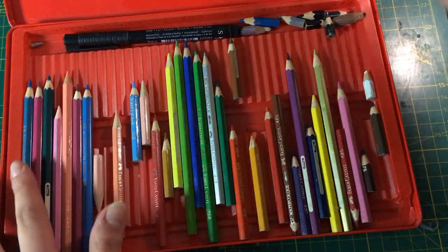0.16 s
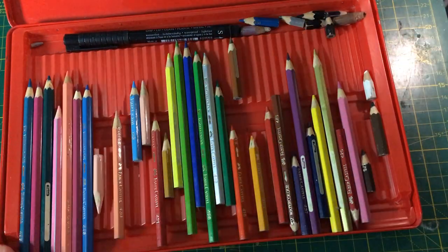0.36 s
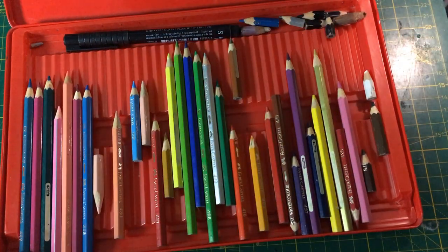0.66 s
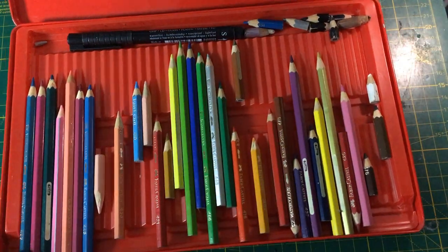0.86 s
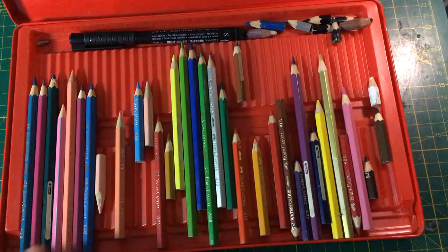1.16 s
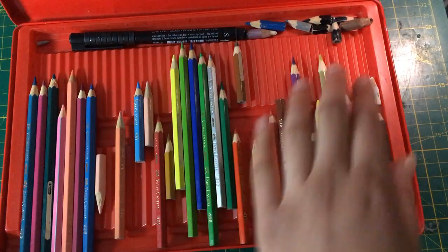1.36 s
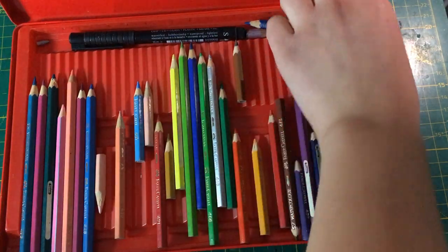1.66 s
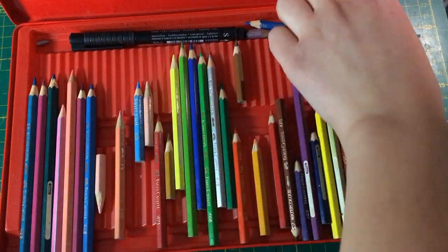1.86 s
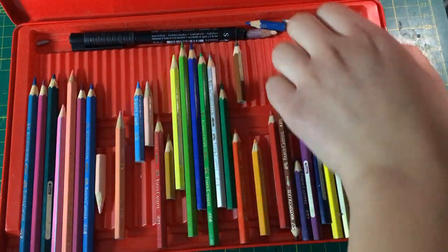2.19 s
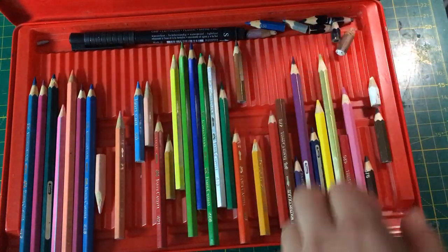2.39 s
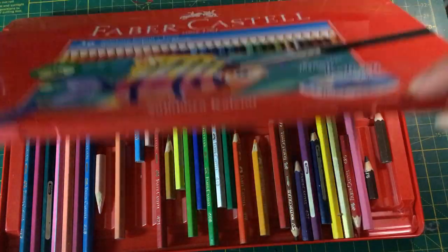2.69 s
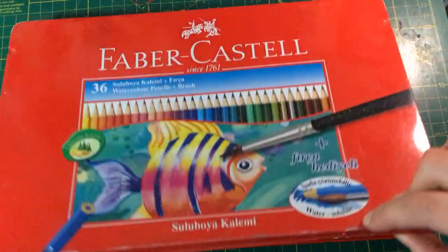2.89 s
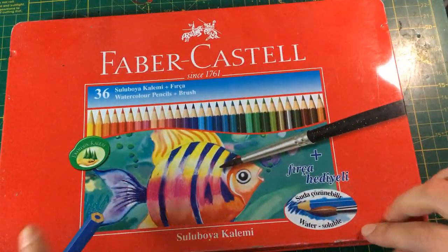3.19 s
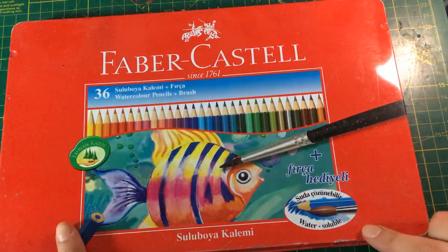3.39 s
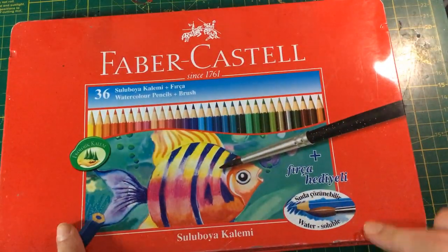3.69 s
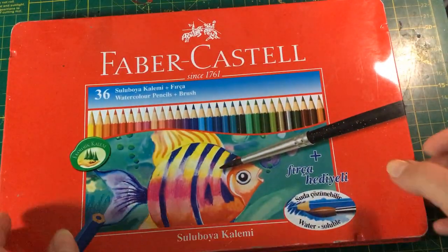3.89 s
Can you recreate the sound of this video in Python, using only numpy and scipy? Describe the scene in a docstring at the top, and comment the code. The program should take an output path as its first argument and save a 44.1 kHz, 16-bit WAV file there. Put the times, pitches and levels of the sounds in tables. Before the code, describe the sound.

Close, dry wooden clacks and a short rattle in a thin metal tin, followed by the lid's clatter, scrape and hard snapping closure.

```python
"""A flat tin of coloured pencils on a cutting mat, taken with a close microphone in a small room.
It slides over the mat, catches and knocks to a stop; fingers touch it, then rattle the pencils in their tray.
The sheet-metal lid is picked up, laid on, scraped into place and pressed shut with a few snaps.
Blows are noise bursts with ringing modes, rubbing is coloured noise in uneven clumps.
A faint fan runs behind it all, and the microphone overloads on the hardest blows."""
import sys
import numpy as np
from scipy import signal
from scipy.fft import rfft, irfft, next_fast_len
from scipy.io import wavfile
from scipy.ndimage import uniform_filter1d, map_coordinates

SR = 44100
rng = np.random.default_rng(int(sys.argv[2]) if len(sys.argv) > 2 else 0)


def transcribe(u):
    """Save the signal u as a 16-bit wav file named by the first command-line argument.

    u: samples, shape (n,) or (channels, n), limited to [-1, 1]; the rate is SR.
    q: integer samples, one column per channel.
    """
    v = np.clip(np.atleast_2d(u).T, -1, 1)
    q = np.round(v * 32767).astype(np.int16)
    wavfile.write(sys.argv[1], SR, q)


N = 178627
TIME = np.arange(N) / SR  # s from the start
AGE = TIME[:SR // 2]  # s since a blow

# lid against the rim; level is that of the middle band, knock is relative to it:
# start_s, level_db, knock_db, main_resonance_hz, contact_t60_s
SNAPS = [(2.9635, -21.5, -4.5, 795, 0.12), (2.9743, -13.5, -18, 850, 0.14), (3.0055, -17, -4.5, 710, 0.073),
         (3.2145, -17, -10, 1480, .1), (3.5535, -1, -5.5, 643, .041), (3.5635, -3.5, -17, 2170, 0.045),
         (3.5774, -3, -4, 650, 0.071), (3.5873, -7, -13, 1740, 0.081), (3.7959, -16, -12, 2260, 0.085),
         (3.9404, -10.5, -1, 693, 0.1)]
SNAP_TREBLE_DB, BOOM_DB = -5, -4  # treble re the middle band; panel's boom re the knock
# lid's edge drags along the rim, before the scrape and hiss gains: start_s, end_s, level_db
SCRAPES = [(2.813, 2.82, -28), (2.87, 2.9, -38.5), (2.912, 2.95, -37.5), (3.0, 3.01, -24),
           (3.185, 3.28, -42), (3.293, 3.303, -31), (3.545, 3.585, -17.5), (3.793, 3.8, -35),
           (3.97, 4.05, -38.5)]
# hollow lid rumbles in the hand: start_s, end_s, level_db
SWINGS = [(2.74, 2.93, -33.5), (2.96, 3.04, -26), (3.22, 3.3, -42)]

# pencils on each other and on the tray; level is that of the middle band, treble is relative to it:
# start_s, level_db, treble_db, main_resonance_hz
CLACKS = [(0.0738, -25.5, 0, 2100), (0.2428, -5.5, -5, 1360), (1.652, -21.5, -12, 1850),
          (1.6601, -17.5, -27, 1490), (1.6958, -16.5, -9, 1880), (1.7094, -15.5, -8, 1710),
          (1.7147, -17, -14, 1860), (1.7369, -13.5, -3, 2030), (1.8355, -12.5, -11, 2250),
          (1.9205, -27, -7.5, 1970), (1.9274, -25.5, -15, 1800), (1.9411, -21.5, -4.5, 3600),
          (1.9997, -40, -7, 3280), (2.019, -43, -2, 3270), (2.0322, -39.5, -5.5, 3360),
          (2.1613, -6.5, -3.5, 2220), (2.1688, -7.5, -18, 2000), (2.188, -16, -6, 2100),
          (2.2101, -8.5, -9.5, 1850)]
CLACK_KNOCK_DB, CLACK_T60_S, CLACK_RISE_S = -18.5, 0.04, 0.0003  # bass re middle; decay; onset constant
# strokes of the fingers over the pencils, before the rubbing and hiss gains: start_s, end_s, level_db
RUMMAGE = [(.46, .51, -53.5), (.87, .885, -37.5), (.94, .965, -37.5), (1.37, 1.41, -49),
           (1.647, 1.674, -29), (1.725, 1.83, -26.5)]

# the push that slides the tin; its level is at full speed, before the friction gains
PUSH_START_S, PUSH_STOP_S, PUSH_RISE_S, PUSH_DB = 0.001, 0.243, 0.067, -24.5
# sliding tin catches on the mat, before the friction gains: start_s, level_db
CATCHES = [(0.1, -22), (.15, -17), (0.211, -20.5)]

# fingers touch the tin and pick up the lid; knock is re the middle band, before a common cut:
# start_s, level_db, knock_db
TOUCHES = [(.699, -44.5, 0), (.8655, -29.5, -4.5), (.88, -32, -6.5), (1.175, -33, -10.5), (2.595, -41, 3),
           (2.697, -38.5, 11), (2.731, -34, 8), (2.747, -30.5, -1), (2.773, -36, -4), (2.8, -30.5, 1),
           (2.905, -32.5, 1.5), (3.207, -27.5, 4.5)]
# main resonance; treble re the middle band, which loses TOUCH_DULLING dB per dB of tabled knock
TOUCH_HZ, TOUCH_TREBLE_DB, TOUCH_DULLING = 2240, -7, 0.14
TOUCH_RING_DB = -16  # level of the tray's ring re the touch
LID_LIFTED_S, LID_TOUCH_DB = 2.65, -6  # from then on the panel booms; its base level re tabled knock

# tin's floor bumps on the mat, before the modes' own levels: start_s, level_db, favoured_hz
BUMPS = [(.868, -22.5, 320), (.885, -29.5, 136), (1.837, -33, 225), (2.162, -29.5, 227), (2.977, -22, 101),
         (2.978, -19.5, 310), (3.215, -30.5, 178), (3.556, -34, 70), (3.579, -22, 130), (3.942, -22, 350)]
BUMP_WIDTH_HZ = 41

# ringing parts, levels relative within each part: pitch_hz, level_db, t60_s
# the pencil tray
TRAY_MODES = [(540, -5, 0.25), (970, -24, .1), (1290, -1, 0.15), (1376, 1, 0.17), (1376, 0, 0.14),
              (1635, -4, 0.096), (1833, -19, 0.65), (2023, -2, 0.038), (2300, 25, 0.088), (2326, 1, .13),
              (3560, 18, 0.2), (4200, 1, 0.082)]
# the lid held by the rim
LID_MODES = [(352, -7.5, 0.2), (531.6, -7.5, 0.19), (1120, -25, 0.13), (1380, 7, 0.13), (1720, -14, 0.17),
             (2036, 3.5, 0.16), (2245, 4, 0.22), (2530, 4, 0.19), (3180, 2, 0.12), (3410, -3, 0.15),
             (4349, -4, 0.12), (5960, -4.5, 0.094)]
# the lid not yet held by the rim
LOOSE_LID_MODES = [(708, -2, .17), (800, -19, .15), (926, 14, 0.018), (990, -3, 0.19), (1094, -3, 0.17),
                   (1216, -5, 0.086), (1420, -2.5, 0.11)]
# the lid's broad panel
PANEL_MODES = [(550, -16, 0.36), (604, -27, .16), (631, 3.5, 0.21), (699, -2.5, 0.2), (716, 6, 0.11),
               (726, 4, 0.14), (840, -31, 0.12)]
# the small metal sharpener
SHARPENER_MODES = [(1790, 6, 0.024), (1840, -8, 0.067), (8890, -8, 0.044), (9130, 6.5, 0.013)]
# low modes of the tin's floor
TIN_FLOOR_MODES = [(79, 1.5, 0.4), (100, -3, 0.13), (133.4, -2, 0.42), (173, -0.5, 0.36), (216, -2.5, 0.21),
                   (288, -1.5, 0.22), (322.6, 0.5, 0.166)]

# colours given to white noise, relative levels: frequency_hz, level_db
# sheet metal
METAL_COLOUR = [(35, -12), (70, -8.5), (200, -21), (330, -7), (480, -10.5), (680, -7), (1220, -4),
                (2250, -3.5), (2970, -8), (3500, -8.5), (6430, -21.5), (8710, -23), (14900, -27.5),
                (16000, -64)]
# wooden pencils
WOOD_COLOUR = [(71, -55), (120, -20.5), (557, -13), (712, -13), (1830, -3.5), (2150, -9.5), (2430, -6),
               (4880, -15.5), (7820, -23), (8840, -22.5), (10600, -28), (14700, -31.5), (16000, -37)]
# tin on the cutting mat
MAT_COLOUR = [(410, -69), (700, -29), (1010, -21), (1150, -6), (1560, -6), (1940, 2.5), (2630, -7),
              (3370, -4.5), (5060, -12), (8880, -14.5), (10100, -16.5), (11200, -13.5), (16000, -25)]
# hollow of the lid
HOLLOW_COLOUR = [(30, -36), (60, -2), (130, 3), (190, -1.5), (315, 4.5), (430, -16), (490, -3), (680, 4.5),
                 (820, -8), (1100, -5), (2200, -10.5), (3200, -32), (6000, -70)]
# rumble of the room
AIR_COLOUR = [(20, -12), (40, -13.5), (70, 4), (100, -8.5), (135, -0.5), (175, -8.5), (215, -5),
              (400, -9.5), (520, -11.5), (820, -22), (1100, -14), (1400, -9), (1900, -17.5), (2700, -25.5),
              (5000, -31.5), (15000, -37.5)]

# narrow bands of the fan, levels relative: centre_hz, width_hz (at -6 dB), level_db
FAN_BANDS = [(1388, 64, -17), (1346.5, 7.7, 10), (1460, 90, -7), (1685, 51, -5), (1838, 50, -2)]
# decay of the small room: frequency_hz, t60_s
ROOM_DECAY = [(100, 0.46), (500, 0.26), (2500, 0.21), (8000, 0.2), (15000, 0.15)]
HISS_DB = -60  # rms of the microphone's own hiss
TOP_HZ = 15900  # band limit


def amp(db):
    """Decibels to gain."""
    return 10 ** (np.asarray(db) / 20)


def unit(x):
    """Scale to rms 1."""
    return x / np.sqrt(np.mean(x ** 2) + 1e-20)


def punch(x, size=256):
    """Scale a blow so that its loudest few milliseconds have rms 1."""
    power = uniform_filter1d(x ** 2, size, mode="constant")
    return x / np.sqrt(power.max() + 1e-20)


def along(points, hz):
    """Read (Hz, value) points on a log axis."""
    f, v = np.transpose(points)
    return np.interp(np.log(hz + 1), np.log(f + 1), v)


def hump(hz, centre, width):
    """Gain of one resonance."""
    return 1 / np.sqrt(1 + (2 * (hz - centre) / width) ** 2)


def coloured(x, gain):
    """Causal (minimum-phase) filter with the given gain of frequency."""
    m = 2 * next_fast_len(len(x) // 2 + 4096)
    log_gain = np.log(np.maximum(gain(np.fft.rfftfreq(m, 1 / SR)), 1e-6))
    # folding the cepstrum onto positive times makes the response causal
    cepstrum = irfft(log_gain, m)
    cepstrum[1:m // 2] *= 2
    cepstrum[m // 2 + 1:] = 0
    response = np.exp(rfft(cepstrum))
    return irfft(rfft(x, m) * response, m)[:len(x)]


def wobble(rate):
    """A smooth random curve, rate knots a second."""
    knots = rng.standard_normal(int(N * rate / SR) + 4)
    return map_coordinates(knots, [TIME * rate])


def add(track, s, sound):
    """Mix a sound in at time s."""
    part = track[max(round(s * SR), 0):][:len(sound)]
    part += sound[:len(part)]


def strokes(rows, attack_s, release_s):
    """Gain of (start, end, dB) strokes: each swells up to its start, holds, dies away (times for 20 dB)."""
    gains = []
    for start, end, db in rows:
        before = np.maximum(start - TIME, 0) / attack_s
        after = np.maximum(TIME - end, 0) / release_s
        gains.append(amp(db - 20 * before - 20 * after))
    return np.linalg.norm(gains, axis=0)


def ring(modes, scatter_db=0.5):
    """Damped modes, struck at new strengths and random polarity each time."""
    total = np.zeros(len(AGE))
    for hz, db, t60 in modes:
        strength_db = db + scatter_db * rng.normal()
        decay = amp(strength_db - 60 * AGE / t60)
        total += rng.choice([-1, 1]) * decay * np.sin(2 * np.pi * hz * AGE)
    return total


def blow(colour, modes, knock_db, treble_db, main_hz, t60, rise, ring_db, crack_db, main_db, click_db):
    """One contact: a click and a sharp crack, a dense fast-dying cluster of modes and a few lasting ones."""
    onset = 1 - np.exp(-AGE / rise)
    decay = amp(-60 * AGE / t60) + amp(crack_db - 60 * AGE / 0.025)
    burst = rng.standard_normal(len(AGE)) * decay * onset
    burst[0] += amp(click_db)

    def body_gain(hz):
        """The body's colour with its main resonance raised."""
        return amp(along(colour, hz)) * (1 + amp(main_db) * hump(hz, main_hz, 0.095 * main_hz))

    sound = punch(coloured(burst, body_gain)) + amp(ring_db) * punch(ring(modes)) * onset
    # where and how hard the contact is sets the shares of knock and treble
    bands = []
    for edges_hz in ([70, 700], [700, 5000], [5000, 17000]):
        band_filter = signal.butter(3, edges_hz, "bandpass", fs=SR, output="sos")
        bands.append(punch(signal.sosfilt(band_filter, sound)))
    knock, middle, treble = bands
    return amp(knock_db) * knock + middle + amp(treble_db) * treble


def friction(colour, rough_db, slip_rate):
    """Tiny slips in uneven clumps, sounding through a body."""
    slips = rng.standard_normal(N) * amp(rough_db * wobble(slip_rate))
    return unit(coloured(slips, lambda hz: amp(along(colour, hz))))


def jostle(colour, rate, size_db):
    """Light chance contacts, each a short burst of noise sounding through a body."""
    contacts = (rng.random(N) < rate / SR) * amp(size_db * rng.standard_normal(N))
    envelope = signal.fftconvolve(contacts, amp(-60 * AGE / 0.011))[:N]
    chatter = envelope * rng.standard_normal(N)
    return unit(coloured(chatter, lambda hz: amp(along(colour, hz))))


def in_room(x, wet_db):
    """Add a fresh diffuse tail whose treble dies first."""
    hz, t, z = signal.stft(rng.standard_normal(len(AGE)), SR, nperseg=256)
    decay = amp(-60 * t / along(ROOM_DECAY, hz)[:, None])
    tail = signal.istft(z * decay, SR, nperseg=256)[1][:len(AGE)]
    tail = tail * (1 - np.exp(-AGE / 0.00084))
    tail = tail / np.linalg.norm(tail)
    return x + amp(wet_db) * signal.fftconvolve(x, tail)[:len(x)]


def lid():
    """The lid's edge snaps over the rim, and its broad panel booms with each knock."""
    out = np.zeros(N)
    for s, db, knock_db, main_hz, t60 in SNAPS:
        snap = blow(METAL_COLOUR, LID_MODES, knock_db, SNAP_TREBLE_DB, main_hz, t60, rise=0.00022,
                    ring_db=-12, crack_db=-13.5, main_db=8, click_db=14.5)
        boom = amp(knock_db + BOOM_DB) * punch(ring(PANEL_MODES))
        add(out, s, amp(db) * (in_room(snap, wet_db=-8) + boom))
    # as it first lands the lid is not yet held by the rim and adds its own ring around 1 kHz
    add(out, 2.9755, amp(-8.5) * punch(ring(LOOSE_LID_MODES)))
    return out


def pencils():
    """Wooden pencils clack on each other and on the tray; a small metal sharpener clinks among them."""
    out = np.zeros(N)
    for s, db, treble_db, main_hz in CLACKS:
        clack = blow(WOOD_COLOUR, TRAY_MODES, CLACK_KNOCK_DB, treble_db, main_hz, CLACK_T60_S,
                     rise=CLACK_RISE_S, ring_db=-20.0, crack_db=-12.5, main_db=4.0, click_db=17.5)
        add(out, s, amp(db) * in_room(clack, wet_db=-12.0))
    add(out, 2.210, amp(-12.5) * ring(SHARPENER_MODES))
    return out


def slide():
    """The tin gathers speed on the mat, catches a few times and knocks to a stop."""
    speed = np.clip((TIME - PUSH_START_S) / PUSH_RISE_S, 0, 1) ** 1.01 * (TIME < PUSH_STOP_S)
    catches = strokes([(s, s, db) for s, db in CATCHES], attack_s=0.019, release_s=0.036)
    strength = np.hypot(amp(PUSH_DB) * speed, catches)
    slips = amp(-2) * friction(MAT_COLOUR, rough_db=1.0, slip_rate=400)
    chatter = amp(-4) * jostle(MAT_COLOUR, rate=380, size_db=1.5)
    out = in_room(strength * (slips + chatter), wet_db=-6)
    stop = blow(WOOD_COLOUR, TRAY_MODES, knock_db=-13.5, treble_db=-10.5, main_hz=1280, t60=0.072,
                rise=0.00044, ring_db=-20.0, crack_db=-6, main_db=0.0, click_db=19.5)
    add(out, 0.2477, amp(-8) * in_room(stop, wet_db=-5.5))
    return out


def rubbing():
    """Pencils rub under the fingers, the hollow lid swings over and drags along the rim."""
    fingers = strokes(RUMMAGE, attack_s=0.02, release_s=0.056)
    edge = strokes(SCRAPES, attack_s=0.01, release_s=0.05)
    swings = strokes(SWINGS, attack_s=0.036, release_s=0.069)
    wood_slips = amp(-2.5) * friction(WOOD_COLOUR, rough_db=1.5, slip_rate=450)
    wood_contacts = amp(-3) * jostle(WOOD_COLOUR, rate=160, size_db=2.0)
    rummage = fingers * (wood_slips + wood_contacts)
    scrape = amp(-0.5) * edge * friction(METAL_COLOUR, rough_db=-0.5, slip_rate=500)
    swing = swings * friction(HOLLOW_COLOUR, rough_db=1.0, slip_rate=73)
    # the finest slips hiss above the body's resonances
    hiss_colour = [(2500, -52), (6000, 18), (13000, 7), (16000, 1)]  # Hz, dB
    hiss = amp(-9.5) * (fingers + edge) * friction(hiss_colour, rough_db=1.5, slip_rate=840)
    return in_room(rummage + scrape + swing + hiss, wet_db=-8.5)


def touches():
    """Soft fingertips nudge the tin: the sound builds over milliseconds; the heavier the knock, the duller."""
    out = np.zeros(N)
    for s, db, knock_db in TOUCHES:
        treble_db = TOUCH_TREBLE_DB - TOUCH_DULLING * knock_db
        touch = blow(METAL_COLOUR, TRAY_MODES, knock_db - 1.5, treble_db, TOUCH_HZ, t60=0.066, rise=0.0015,
                     ring_db=TOUCH_RING_DB, crack_db=-7, main_db=3, click_db=-15)
        # the panel booms only once the lid is in the hand
        boom = (s > LID_LIFTED_S) * amp(knock_db + LID_TOUCH_DB) * punch(ring(PANEL_MODES))
        add(out, s, amp(db) * (in_room(touch, wet_db=-3.0) + boom))
    return out


def bumps():
    """The soft mat lets only the tin's lowest modes speak; the place of the bump favours some of them."""
    out = np.zeros(N)
    onset = 1 - np.exp(-AGE / 0.00078)
    for s, db, favoured_hz in BUMPS:
        thud = np.zeros(len(AGE))
        for hz, mode_db, t60 in TIN_FLOOR_MODES:
            thud += hump(hz, favoured_hz, BUMP_WIDTH_HZ) * ring([(hz, mode_db, t60)])
        add(out, s, amp(db) * thud * onset)
    return out


def background():
    """Slowly wavering room rumble, the narrow whirr of a small fan and the microphone's own hiss."""
    def fan_gain(hz):
        """Sum of the fan's narrow bands."""
        return sum(amp(db) * hump(hz, centre, width) ** 2 for centre, width, db in FAN_BANDS)

    air = unit(coloured(rng.standard_normal(N), lambda hz: amp(along(AIR_COLOUR, hz))))
    rumble = amp(-41.5 + 1.23 * wobble(4.53)) * air
    whirr = amp(-47.5) * unit(coloured(rng.standard_normal(N), fan_gain))
    hiss = amp(HISS_DB) * rng.standard_normal(N)
    return rumble + whirr + hiss


def scene():
    """All sources at one close microphone."""
    return (lid() + pencils() + slide() + rubbing() + touches() + bumps() + background())[None]


def record(dry):
    """The loudest blows clip at full scale; nothing passes the band limit."""
    clipped = np.clip(dry, -1, 1)
    passed = np.fft.rfftfreq(2 * N, 1 / SR) < TOP_HZ
    return irfft(rfft(clipped, 2 * N) * passed)[:, :N]


dry = scene()
out = record(dry)
transcribe(out)
```